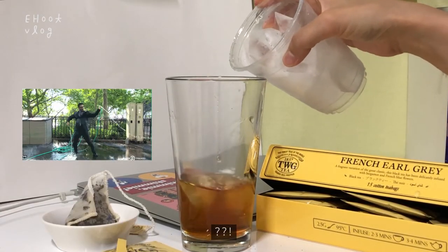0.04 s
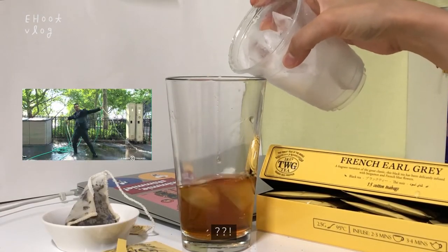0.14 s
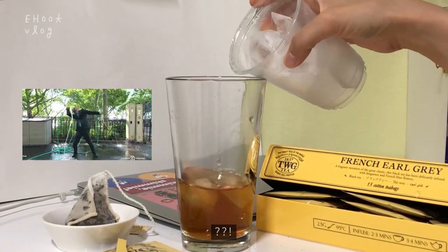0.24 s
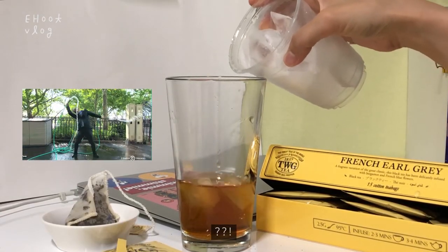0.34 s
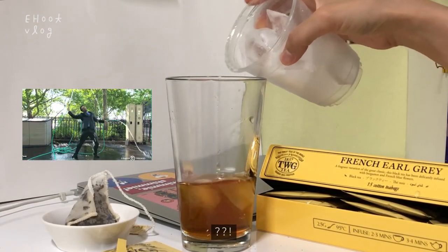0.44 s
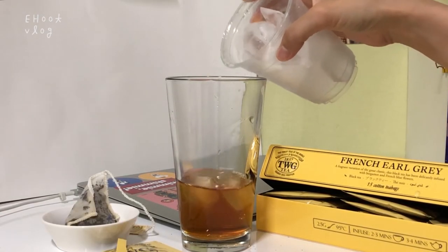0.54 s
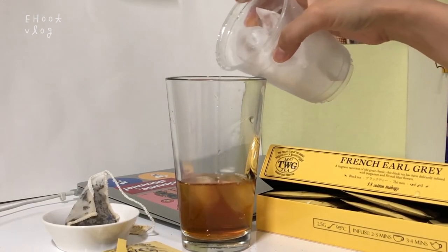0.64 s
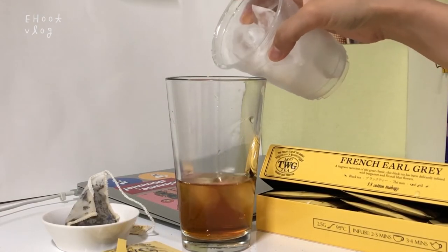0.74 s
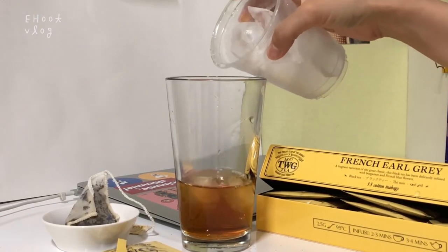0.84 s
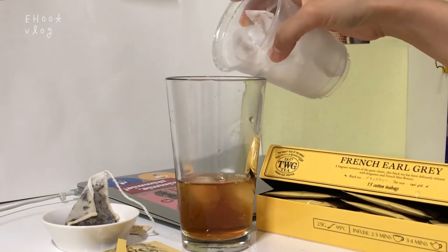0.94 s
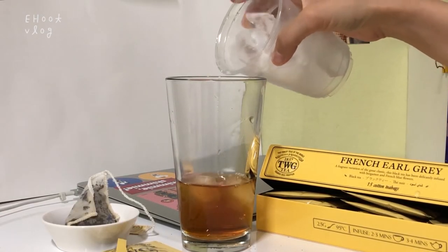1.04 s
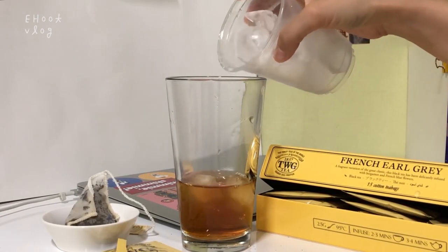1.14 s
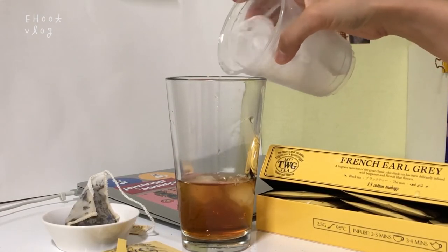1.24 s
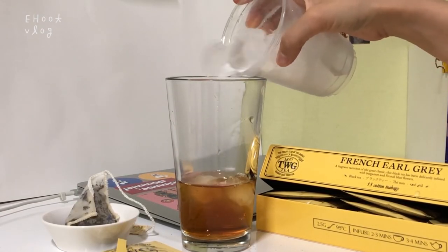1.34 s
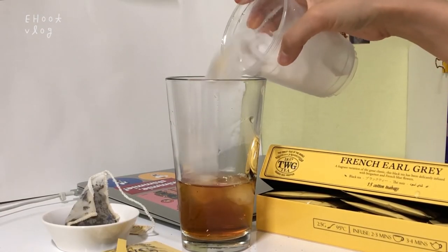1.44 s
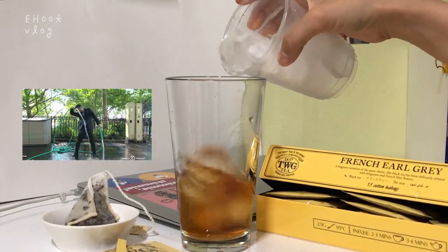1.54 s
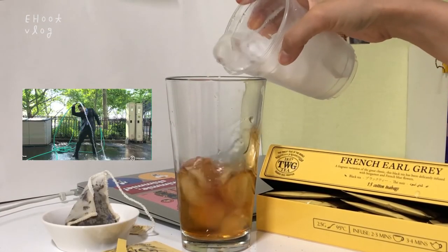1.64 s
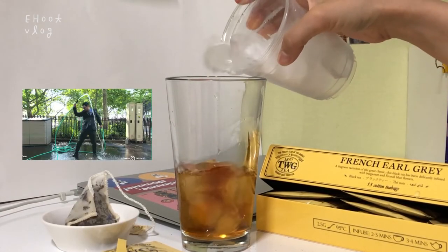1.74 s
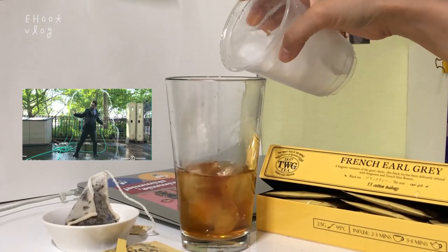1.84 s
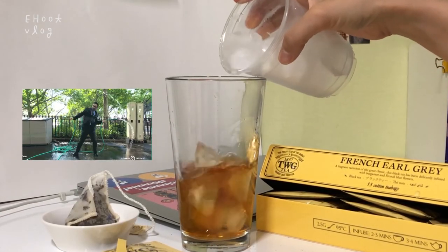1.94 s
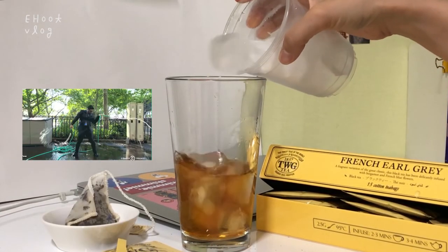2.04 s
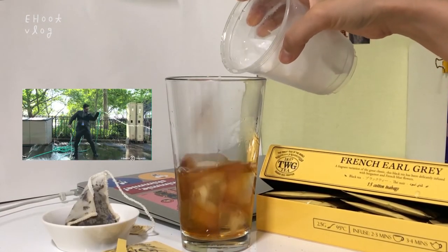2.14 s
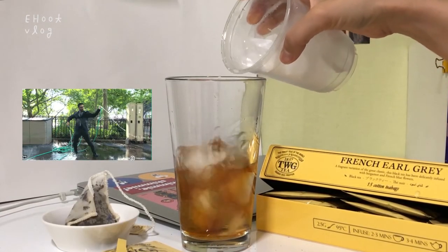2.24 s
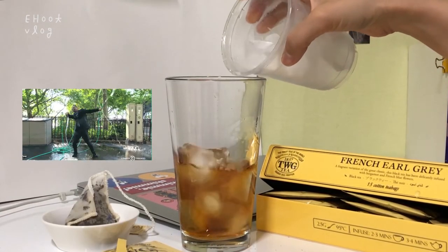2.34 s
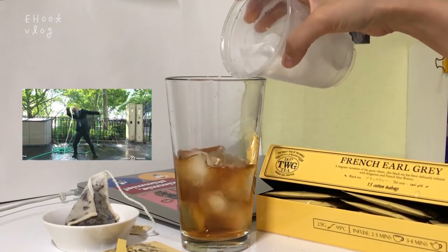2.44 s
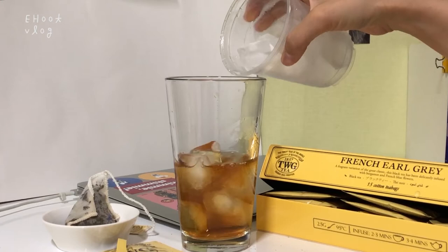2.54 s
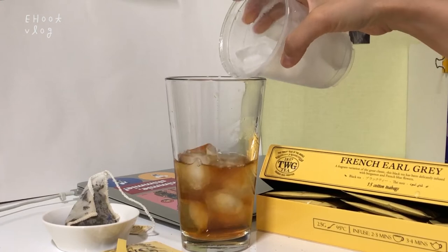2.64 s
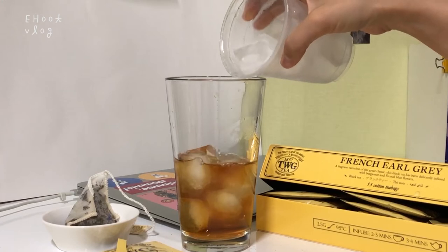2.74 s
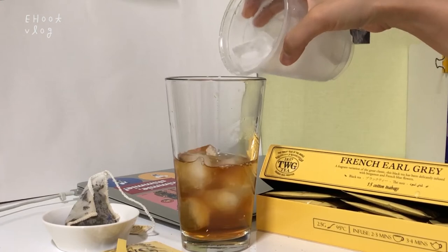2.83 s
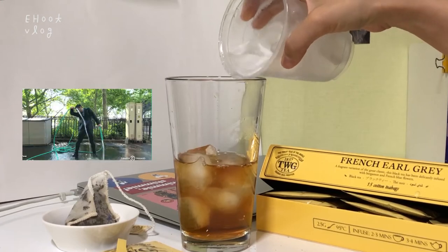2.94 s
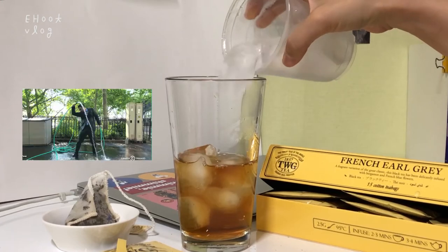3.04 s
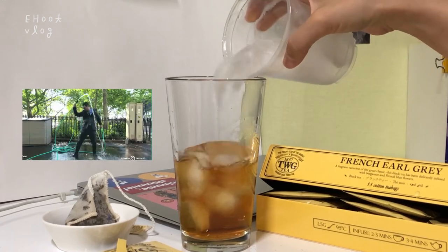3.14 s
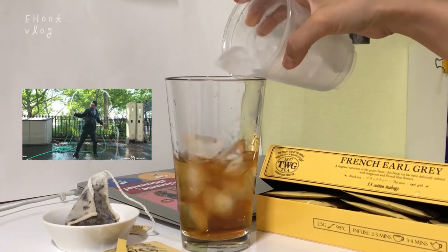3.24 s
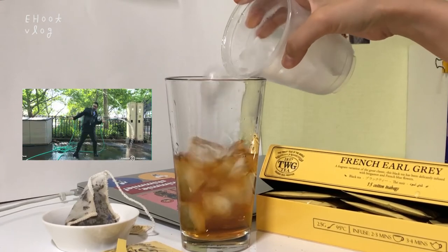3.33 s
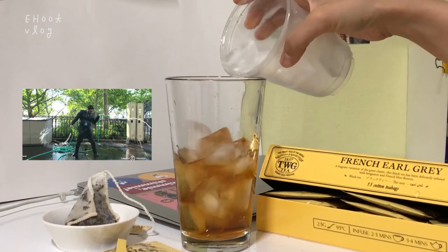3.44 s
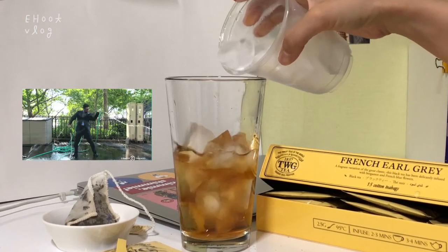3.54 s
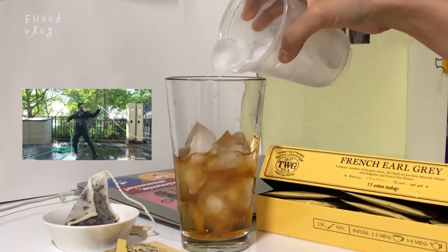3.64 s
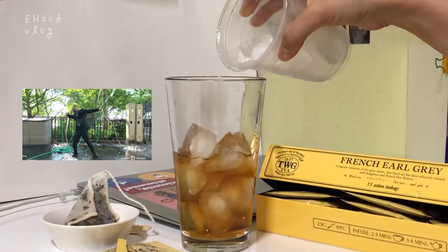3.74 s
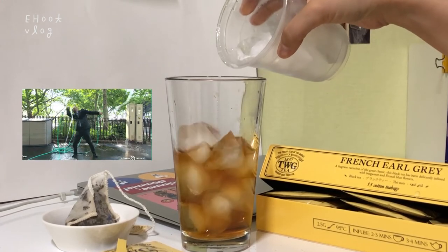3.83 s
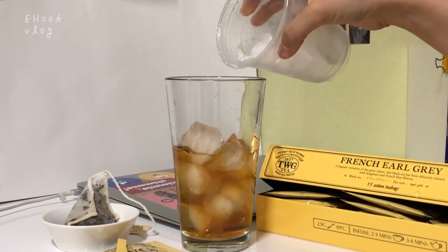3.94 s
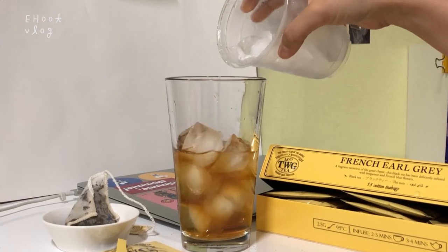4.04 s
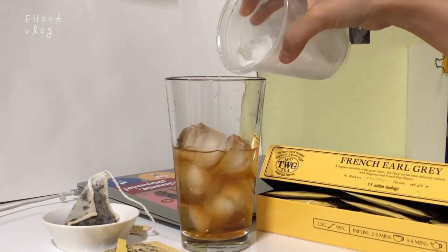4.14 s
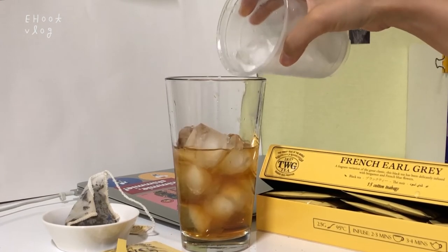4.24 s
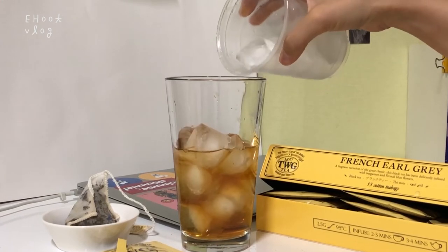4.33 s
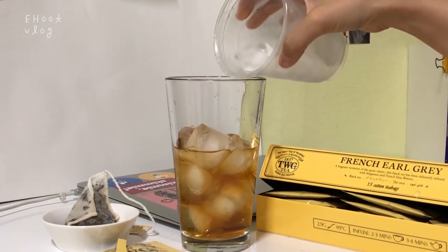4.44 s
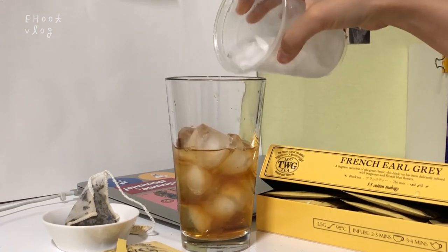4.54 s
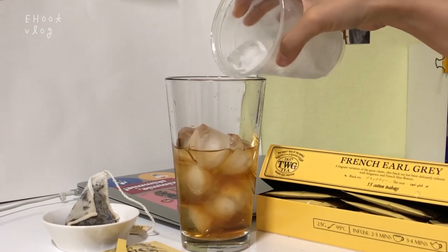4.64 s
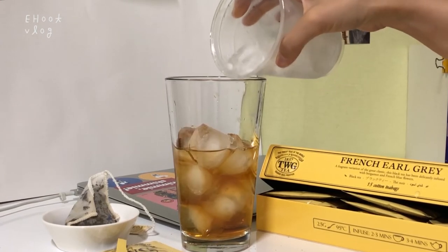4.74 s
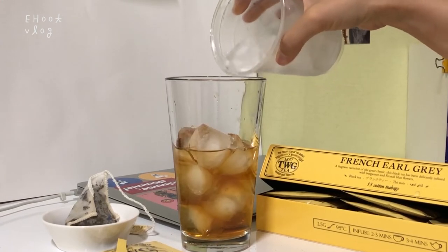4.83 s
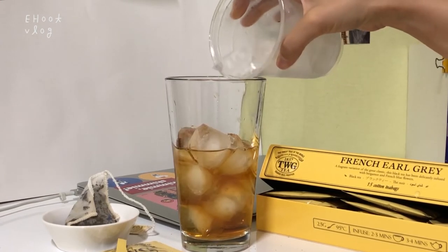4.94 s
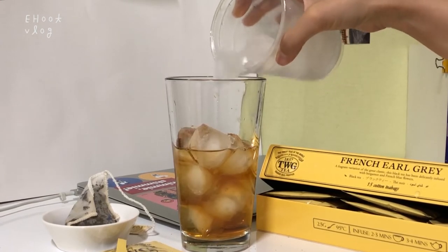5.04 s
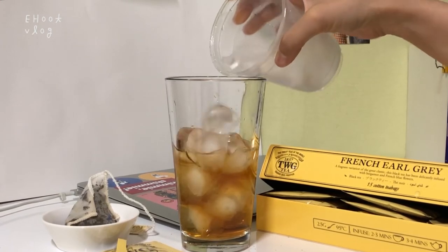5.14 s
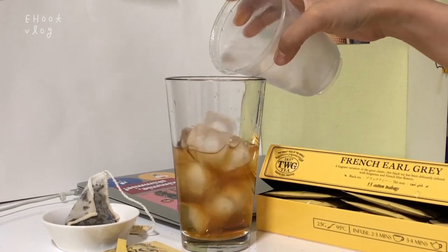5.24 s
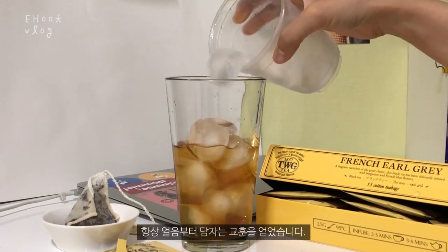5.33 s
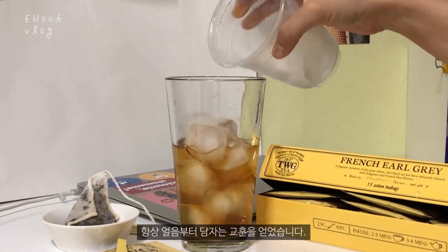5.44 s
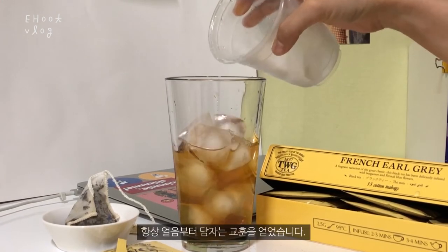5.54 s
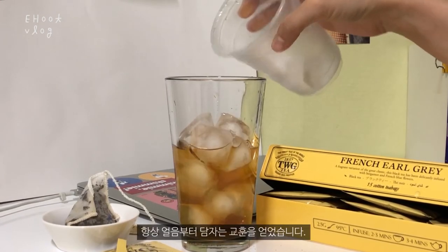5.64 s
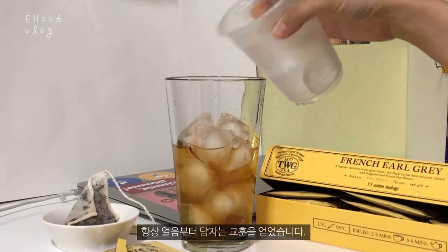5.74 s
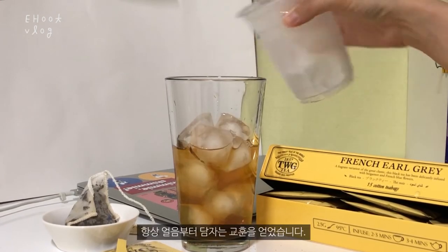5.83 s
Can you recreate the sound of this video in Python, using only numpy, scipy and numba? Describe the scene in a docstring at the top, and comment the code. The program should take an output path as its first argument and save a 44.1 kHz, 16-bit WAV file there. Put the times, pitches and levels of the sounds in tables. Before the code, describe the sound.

A quiet kitchen, miked very close. Faint ticks of ice in a thin plastic cup build to a rattling slide, then cubes tumble into a tall glass of tea with sharp clinks, cracks and low wet gulps. More drops follow in uneven clusters, with hollow cup knocks between them. The glass rings briefly, duller as it fills. A faint murmur and hiss stays underneath.

```python
"""A quiet kitchen, close up: ice cubes slide out of a thin plastic cup and drop into a tall glass of cold tea.
Sliding cubes are dense noise puffs through cup and scrape resonances; knocks are pings, cracks and cup booms.
Cubes clink the glass, whose wall modes are decaying sines; the lowest note sinks as the drink rises.
Cubes plunge into the tea with dull gulps, rising low sines within sloshing noise.
A steady faint murmur and hiss lies underneath, and the ice has a short dull reverberation."""
import sys
import numpy as np
from scipy import signal
from scipy.fft import rfft, irfft
from scipy.io import wavfile
from scipy.ndimage import uniform_filter1d
from numba import njit

SR = 44100
rng = np.random.default_rng(int(sys.argv[2]) if len(sys.argv) > 2 else 0)


def output_pcm(signal):
    """Save a mono or channel-first signal as 16-bit PCM at the path in sys.argv[1].

    Samples are clipped to [-1, 1] before scaling.
    """
    pcm = np.clip(np.atleast_2d(signal).T, -1, 1) * 32767
    wavfile.write(sys.argv[1], SR, np.round(pcm).astype(np.int16))


N = 259308
TIME = np.arange(N) / SR

# resonances of air and tea in the glass: (f/Hz, width/Hz, relative level/dB)
SLOSH_MODES = [(135.7, 30, -5), (225.5, 53, 0.5), (340, 75, 0.5), (488, 118, -6)]


def undb(db):
    """Decibels to gain."""
    return 10 ** (np.asarray(db) / 20)


def unit(x):
    """Scale to rms 1."""
    return x / np.sqrt(np.mean(x ** 2))


def band(x, hz, width_hz):
    """Two-pole resonance, gain 1 at the centre."""
    return signal.lfilter(*signal.iirpeak(min(hz, .45 * SR), max(hz / width_hz, .6), SR), x)


def resonate(x, modes):
    """Sum of resonances of alternating sign."""
    return sum((-1) ** k * undb(db) * band(x, hz, width) for k, (hz, width, db) in enumerate(modes))


@njit
def sweep(x, hz, width):
    """Band-pass whose centre moves."""
    y, b, l = np.empty(len(x)), 0., 0.
    for i in range(len(x)):
        g, k = np.tan(np.pi * hz[i] / SR), width / hz[i]
        v = (b + g * (x[i] - l)) / (1 + g * (g + k))
        b, l, y[i] = 2 * v - b, l + 2 * g * v, k * v
    return y


def fade(t, t60):
    """Exponential decay, 60 dB down after t60."""
    return np.exp(-np.log(1000) * t / max(t60, .002))


def bursts(per_s, scatter_db, t60):
    """Noise in short uneven puffs, one for each tiny impact; a few are much larger than the rest."""
    hit = rng.random(N) < per_s / SR
    size_db = scatter_db * np.minimum(rng.exponential(size=N), 4)
    size = undb(size_db) * hit / np.sqrt(per_s)
    envelope = signal.lfilter([1], [1, -fade(1 / SR, t60)], size)
    return envelope * rng.standard_normal(N)


def add(out, s, sound):
    """Mix a sound in at a time."""
    i = int(s * SR)
    out[i:i + len(sound)] += sound[:N - i]


def kitchen():
    """Steady faint low murmur and hiss: noise shaped by a fixed spectrum."""
    # colour of the background: (f/Hz, relative level per Hz/dB)
    spectrum = [(20, -25.5), (40, -4.5), (60, 3.5), (120, 3.5), (250, -2.5), (700, -14.5), (1500, -13),
                (3000, -28.5), (6000, -25), (16000, -29.5)]
    level_db = -66  # rms
    hz, db = np.transpose(spectrum)
    colour = undb(np.interp(np.log(np.fft.rfftfreq(N, 1 / SR) + 1), np.log(hz), db))
    noise = irfft(rfft(rng.standard_normal(N)) * colour, N)
    return undb(level_db) * unit(noise)


def cup_modes(s):
    """Modes of the cup at a time; the tilt shares the boom between the lowest two."""
    # body resonances of the cup: (f/Hz, width/Hz, relative level before the tilt/dB)
    body = [(766, 177, 2.5), (878.4, 142, -3.5), (1784, 200, -4.5), (2696, 110, -18)]
    # the cup tilts and empties: (t/s, shift of the second mode against the first/dB)
    tilt = [(0, -25.5), (1.4, -4), (2.6, 4.5), (4.4, 8), (4.53, -9.5), (4.75, 0.5), (5.8, 9.5)]
    lean = np.interp(s, *np.transpose(tilt)) / 2
    return [(hz, width, db + side * lean) for (hz, width, db), side in zip(body, (-1, 1, 0, 0))]


def sliding():
    """Level of the rattle in the cup: straight ramps in dB up to each peak and down again."""
    # cubes slide along the tilted cup: (peak t/s, peak level/dB, rise over ramp_db/s, fall over ramp_db/s)
    slides = [(0.05, -77.5, 0.51, 1), (0.488, -62.5, 0.044, 0.079), (0.628, -60, 0.061, 0.2),
              (0.851, -59, 0.22, 0.32), (1.011, -54.5, 0.2, 0.65), (1.304, -41, 0.2, 0.27),
              (1.458, -40.5, 0.058, 0.03), (1.601, -46.5, 0.062, 0.051), (1.755, -47, 0.063, 0.04),
              (1.948, -49.5, 0.81, 0.25), (2.3, -56, 0.077, 0.35), (2.599, -50.5, 0.36, 0.041),
              (2.8, -61.5, 0.033, 0.48), (3.2, -38.5, 0.46, 0.34), (3.53, -53.5, 0.28, 0.048),
              (3.69, -58, 0.045, 0.031), (3.9, -61.5, 0.2, 0.3), (4.25, -58, 0.13, 0.28),
              (4.436, -61, 0.024, 0.2), (4.541, -45, 0.09, 0.17), (4.796, -52.5, 0.053, 0.44),
              (5, -46.5, 0.29, 0.13), (5.135, -52.5, 0.12, 0.14), (5.369, -48.5, 0.32, 0.2),
              (5.7, -57.5, 0.16, 0.97), (5.809, -40, 0.042, 0.058)]
    ramp_db = 20
    peak, db, swell, die = np.transpose(slides)[:, :, None]
    t = TIME[::64]
    level = undb(db - ramp_db * np.maximum((peak - t) / swell, (t - peak) / die))
    return np.interp(TIME, t, np.sqrt(np.sum(level ** 2, axis=0)))


def settling():
    """Levels of scrape and slosh in the glass: a quick rise at each landing, then decay."""
    # cubes in the glass jostle and settle: (t/s, scrape level/dB, slosh level/dB, t60/s)
    settles = [(0.0, -66.5, -71.5, 1.53), (0.482, -42, -40, 0.059), (1.475, -38.5, -49, 0.35),
               (1.56, -46.5, -64, 0.26), (1.85, -46, -48.5, 0.5), (1.89, -30, -38, 0.063),
               (2.185, -35.5, -28, 0.19), (2.3, -60, -51.5, 0.49), (3.131, -57.5, -33.5, 0.24),
               (3.25, -45.5, -42.5, 0.52), (3.406, -44.5, -40.5, 0.57), (3.777, -42.5, -39.5, 0.46),
               (3.831, -35, -59, 0.16), (3.95, -76, -65.5, 1.2), (4.415, -39.5, -56, 0.13),
               (5.118, -44.5, -46, 0.91), (5.43, -30.5, -27.5, 0.16), (5.52, -66, -50, 0.61)]
    rise_s = 0.017
    s, scrape_db, slosh_db, t60 = np.transpose(settles)[:, :, None]
    t = TIME[::64]
    since = np.maximum(t - s, 0)
    shape = np.minimum(since / rise_s, 1) * undb(-60 * since / t60)
    levels = [np.sqrt(np.sum((undb(db) * shape) ** 2, axis=0)) for db in (scrape_db, slosh_db)]
    return [np.interp(TIME, t, level) for level in levels]


def slide():
    """Dense small impacts ring the cup and scrape brightly; the tea sloshes below."""
    # broad colours of the scrape: (f/Hz, width/Hz, relative level/dB)
    scrape_modes = [(2360, 5360, 3.5), (4280, 3340, 3.5), (5420, 380, 5), (7700, 3000, -7),
                    (12200, 12000, -15)]
    scrape_db, slosh_db = -4.5, -9.5  # over the cup hollow; the scrape's holds at brisk_db
    # the scrape gains this share of each dB above this level, and loses it below
    brisk_db, brisk_gain = -48.5, 0.28
    cup, (jostle, swash) = sliding(), settling()

    # brisk sliding packs the impacts closer
    busy = np.clip(np.hypot(cup, jostle) / undb(brisk_db), .45, 2.5)
    # shifting cubes keep retuning the air in the cup
    waver = 1 + 0.035 * unit(band(rng.standard_normal(N), 8, 13))
    rattle = bursts(650 * busy, 3, .012)
    hollow = 0
    for hz, width, db in cup_modes(TIME):
        once = sweep(rattle, hz * waver, 1. * width)
        hollow = hollow + undb(db) * sweep(once, hz * waver, 1. * width)

    grit = resonate(bursts(700 * busy, 4.5, .004), scrape_modes)
    grit = signal.sosfilt(signal.butter(2, 1500, "high", fs=SR, output="sos"), grit)
    # each facet that catches clicks at its own pitch, a new one every 256 samples
    facet_hz = np.repeat(1700 * 2 ** (1.8 * rng.random(N // 256 + 1)), 256)[:N]
    clicks = sweep(bursts(410, 3.2, 0.006), facet_hz, 350.0)
    scrape = unit(unit(grit) + 0.45 * unit(clicks))
    slosh = unit(resonate(bursts(300, 3, .03), SLOSH_MODES))

    cup_scrape = undb(scrape_db) * cup * (cup / undb(brisk_db)) ** brisk_gain
    scrape_level = np.hypot(cup_scrape, jostle)
    slosh_level = np.hypot(undb(slosh_db) * cup, swash)
    return cup * unit(hollow) + scrape_level * scrape + slosh_level * slosh


def knocks():
    """A short ping, a broad crack with a crunchy tail, and the boom of the hollow cup."""
    # short knocks of ice on ice, cup or glass foot, and a bubble:
    # (t/s, overall level/dB, ping f/Hz, treble crack relative level/dB, hollow cup relative level/dB)
    hits = [(0.0288, -51.5, 4270, 3, -8), (0.105, -60, 5500, -30, -24), (0.103, -56, 2550, -30, -25),
            (0.1347, -58.5, 5470, -23, -10), (0.212, -68, 5400, -26, -20), (0.233, -59.5, 3200, -2, -11),
            (0.354, -70, 5450, -20, -23), (0.479, -48.5, 5050, 6, 1), (0.492, -54, 4300, -23, -18),
            (0.5907, -59, 3980, -33, 12.5), (0.7063, -54, 2200, -18, -10), (0.723, -45, 2200, 0, 1),
            (0.779, -48.5, 4200, -22, -13), (0.836, -59.5, 3330, 17.5, 3), (0.8646, -50.5, 3080, -33, 2),
            (0.882, -46, 3340, -15, 10), (0.944, -51.5, 5500, 14, -29), (0.9941, -30.5, 5680, 12.5, -36),
            (1.1526, -40, 2780, 13, 8), (1.1804, -35, 4200, -23, -28), (1.217, -31.5, 4130, -28, -32),
            (1.2422, -34, 3330, -35, -20), (1.287, -34, 3180, -54, -14), (1.3299, -29.5, 5950, -22, -13),
            (1.343, -35, 4400, -20, 13.5), (1.3993, -35.5, 5360, -30, -28), (1.407, -31.5, 5070, -22, -27),
            (1.4721, -29, 5500, -28, 2), (1.477, -31, 2820, -30, -24), (1.494, -24, 5380, -28, -34),
            (1.509, -23.5, 5380, -20, -22), (1.539, -19.5, 5290, -3, -23), (1.6075, -24, 2330, -35, -26),
            (1.6216, -35, 4860, 10, -32), (1.624, -29, 3020, -23, 0), (1.634, -30, 2630, -20, -11),
            (1.638, -30, 1300, -30, -14), (1.678, -38, 2930, -25, -21), (1.7316, -39, 5670, -31, 6),
            (1.755, -40, 4000, -12, 12), (1.8141, -34, 5200, -13, -11), (1.8816, -20, 3770, -4, -10),
            (1.918, -24, 3800, -21, -27), (2.0267, -36, 2380, -19, -23), (2.179, -28, 4800, 5, -13),
            (2.1878, -20, 4340, -4, -36), (2.21, -21, 3520, -36, -28), (2.26, -29, 3220, -3, -38),
            (2.299, -41.5, 3870, -20, -18), (2.379, -43, 4400, 1, -11), (2.434, -55.5, 6600, 14, -15),
            (2.469, -50, 3200, 14, 15), (2.499, -46.5, 2700, -20, 10), (2.5257, -44, 2900, -22, 13.5),
            (2.546, -50.5, 1935, -20, 19.5), (2.5696, -52, 3550, -30, 0), (2.592, -44.5, 3600, -33, 19.5),
            (2.616, -46.5, 3270, -20, -6), (2.668, -46.5, 2470, 0, 14), (2.684, -48.5, 2000, -23, 15),
            (2.7813, -48, 3380, -38, 11), (2.816, -59, 1830, -20, 24), (2.866, -43, 3600, -27.5, -20),
            (2.883, -33, 3820, -14, 8), (2.89, -43, 3880, -16.5, -5), (2.9081, -44, 3270, -35.5, 16),
            (2.936, -34.5, 3670, -37, 6.5), (2.9645, -32.5, 5700, -21, 9), (2.9988, -12, 7100, -45, -30),
            (3.029, -27.5, 8050, -28, -34), (3.046, -30.5, 5170, -25, 7), (3.0673, -34, 3250, -16, 16),
            (3.082, -34.5, 6500, -6, -21.5), (3.1299, -24.5, 3900, 9, -23), (3.1457, -30, 4500, -12, -25),
            (3.246, -28.5, 4300, 6, -6), (3.4035, -22.5, 4330, -36, -20), (3.488, -46, 4330, -37.5, -23),
            (3.5498, -33.5, 2680, -37, 4), (3.6727, -45, 2640, -27, -19), (3.7723, -12.5, 4830, -24, -33),
            (3.7858, -16.5, 4400, -26, -57), (3.8085, -22, 3460, -24, -40), (3.8237, -16, 4560, 9, -46),
            (3.862, -33, 4670, -23, -25.5), (3.957, -54, 3000, -25, -25), (4.009, -55, 3200, -30, -24),
            (4.039, -57.5, 2290, -28.5, -19), (4.2323, -60, 4610, 9, -6), (4.2807, -51.5, 5750, 21, 2.5),
            (4.4125, -33.5, 4130, -47, 3), (4.4265, -45.5, 3960, -22, 19.5), (4.4897, -50, 8000, 14, -12),
            (4.5199, -20, 2060, -35, 5), (4.573, -36, 1900, 10, -17), (4.6337, -38, 9300, 16, -37),
            (4.6529, -32, 2260, 0, 8), (4.6948, -46, 2900, 8, 8), (4.7724, -46.5, 3050, -18, -2),
            (4.79, -42, 5930, 12, -11), (4.8722, -35.5, 5760, 4, 5.5), (4.947, -43, 2670, 15, 4),
            (5.035, -46, 3500, 16.5, -10), (5.1173, -23.5, 2660, 2.5, -20), (5.177, -39, 4540, -23, -24),
            (5.2091, -26.5, 4070, -30, -33.5), (5.232, -30, 2780, -29, -21), (5.3526, -39.5, 3440, 3, 15.5),
            (5.4293, -21.5, 4370, -28, -32), (5.469, -25.5, 2640, -8, -36), (5.6258, -59, 4480, -10, 11),
            (5.7196, -58.5, 3640, 24, -27), (5.757, -41, 3160, -34, -0.5), (5.7978, -23.5, 3440, -42, 13),
            (5.838, -47, 3020, -10, 26.5)]
    # ring of the thick foot of the glass: (f/Hz, t60/s, relative level/dB)
    foot_modes = [(5490, 0.03, 8.5), (8560, 0.035, -6), (13030, .15, -16)]
    out, t = np.zeros(N), TIME[:SR // 6]
    foot = sum(undb(g) * np.sin(2 * np.pi * f * t) * fade(t, t60) for f, t60, g in foot_modes)
    noises = rng.standard_normal((len(hits), len(t)))
    for (s, db, hz, crack_db, cup_db), noise in zip(hits, noises):
        tone = np.sin(2 * np.pi * hz * t) * fade(t, 28 / hz) * (1 - fade(t, 7 / hz))
        rough = band(band(noise, hz, .6 * hz), hz, .6 * hz) * (fade(t, .012) + .09 * fade(t, .12))
        ping = 1.3 * tone + 1.9 * rough
        # pings far from the middle pitches carry less body
        body = min(2600 / hz, hz / 4200) ** 2
        thud = 2.14 * body * band(noise, 2880, 1300) * fade(t, 0.054)
        crack = band(noise, 10000, 9200) * (fade(t, 0.0012) + 0.077 * fade(t, 0.15))
        boom = sum(undb(g) * np.sin(2 * np.pi * f * t) * np.exp(-1.5 * w * t) for f, w, g in cup_modes(s))
        boom = boom * (1 - fade(t, 0.016))
        # a knock pitched near the foot's own note sets it ringing
        match = np.exp(-((hz - foot_modes[0][0]) / 150) ** 2)
        struck = (1 - match) * (ping + thud) + 0.89 * match * foot
        add(out, s, undb(db) * (struck + 0.74 * undb(crack_db) * crack + 0.57 * undb(cup_db) * boom))
    return out


def glass():
    """Each touch stops the ring before it and starts a new one; ice leaning on the wall shortens and roughens it."""
    # cube against the glass wall: (t/s, lowest mode relative level/dB, second mode relative level/dB,
    # loss to each higher mode/dB, freedom to ring/0-1)
    clinks = [(0.105, -51.5, -83, 13, 1), (1.065, -67, -92, 5, 0.8), (1.424, -39, -27, 0, 0.9),
              (1.4714, -36, -39, 9, 0.9), (1.5247, -31, -45, -1.5, 1), (1.61, -43.5, -50, 0, 0.25),
              (1.626, -50.5, -40, 25, 0.75), (1.712, -58, -62, 24, 0.8), (1.73, -55, -58, 11, 0.43),
              (1.846, -41.5, -34.5, 7.5, 0.31), (1.869, -47, -37, 6, 0.47), (1.927, -37, -41, 4.5, 0.32),
              (2.024, -46.5, -64, 16, 0.84), (2.113, -49, -54.5, 7, 0.6), (2.188, -38, -38, 12, 0.5),
              (2.2096, -31, -35.5, 23, 0.62), (2.2592, -53.5, -44.5, 29, 0.64),
              (2.315, -50.5, -59, 20, 0.63), (2.606, -66, -62, 24, 0.62), (3.099, -46.5, -42.5, -5.5, 0.8),
              (3.144, -34.5, -31.5, 11, 0.3), (3.193, -42, -34, 7, 0.25), (3.227, -45, -49, 2, 0.2),
              (3.245, -35.5, -34.5, 2, 0.35), (3.4051, -32.5, -38, 6, 0.11), (3.432, -39, -43.5, 23, 0.27),
              (3.489, -40.5, -50.5, 0.5, 0.2), (3.549, -51, -50, 4.5, 0.11), (3.672, -52, -62.5, 29, 0.04),
              (3.776, -52, -41, 3, 0.9), (3.824, -30, -22.5, 2, 0.11), (3.8686, -35, -38, 3.5, 0.06),
              (3.92, -54.5, -57, 3, 0.2), (4.037, -61.5, -64, 13, 0.1), (4.635, -80, -50, 21, 0.08),
              (5.121, -33.5, -53, 12, 0.02), (5.164, -43.5, -45.5, 24, 0.56), (5.188, -47, -39, 9, 0.5),
              (5.238, -49.5, -56, 9, 0.66), (5.305, -52.5, -59.5, 4, 0.2), (5.4299, -37.5, -50, -1, 0.8),
              (5.442, -32, -38.5, 8, 0.18), (5.47, -32, -45, 2.5, 0.53), (5.5, -42, -45.5, 9, 0.18),
              (5.5644, -62, -65, 19, 0.18), (5.6302, -50, -50.5, 35, 0)]
    # the drink rises: (t/s, lowest glass mode f/Hz)
    fill = [(0, 2071), (1.6, 2071), (2.2, 2041), (3.2, 2007), (3.8, 2000), (5.15, 1982), (5.5, 1962)]
    # upper wall modes: (f/Hz, t60 when free/s)
    upper_modes = [(4560, 0.38), (7765, 0.063), (11770, 0.04)]
    low_t60_s = 0.83  # when free
    # a weak mode that sounds with the lowest when ice leans on the wall
    partner_hz, partner_t60_s, partner_db = 2825, .3, -5.5
    # the rim keeps ringing faintly once the damped part has died
    after_db, after_t60_s = -18.5, 0.29
    contact_db = -18.5  # tick of the touch against the louder of the two lowest modes

    s, low_db, second_db, loss_db, loose = np.transpose(clinks)
    leaning_db = low_db + partner_db * (1 + 3 * loose)
    mode_db = [low_db, second_db, second_db - loss_db, second_db - 2 * loss_db, leaning_db]
    low_hz = np.interp(TIME, *np.transpose(fill))
    modes = [(low_hz, low_t60_s)] + upper_modes + [(partner_hz, partner_t60_s)]
    last = np.maximum(np.searchsorted(s, TIME) - 1, 0)  # the latest touch at each moment
    since, free = np.maximum(TIME - s[last], 0), np.clip(loose[last], .03, 1)
    started = TIME > s[0]
    out = 0
    for (hz, t60), db in zip(modes, mode_db):
        chatter = unit(band(rng.standard_normal(N), 30, 36))
        decay = undb(-60 * since / (t60 * free)) + undb(after_db - 60 * since / after_t60_s)
        ring = decay * undb(db[last] + 3.54 * (1.26 - free) * chatter) * started
        # every touch starts at a new random phase
        phase = 2 * np.pi * (np.cumsum(hz * np.ones(N)) / SR + rng.random(len(s))[last])
        # a short average softens the steps in level
        out = out + 1.764 * uniform_filter1d(ring, size=24) * np.sin(phase)
    tick = undb(np.maximum(low_db, second_db)[last] + contact_db - 60 * since / 0.014) * started
    return out + tick * band(rng.standard_normal(N), 4000, 6000)


def plunges():
    """The cavity behind a sinking cube closes: a low rising gulp within a burst of dull slosh."""
    # cube into the tea: (t/s, overall level/dB, starting cavity f/Hz, t60/s)
    drops = [(1.475, -13.5, 399, 0.075), (1.527, -23.5, 373, 0.11), (1.548, -20, 214, 0.068),
             (1.741, -33, 337, 0.084), (1.884, -20.5, 232, 0.12), (1.916, -27.5, 368, 0.014),
             (2.181, -19.5, 360, 0.083), (3.128, -27.5, 364, 0.11), (3.215, -26.5, 370, 0.11),
             (3.247, -34, 338, 0.11), (3.408, -19, 347, 0.095), (3.448, -33, 185, 0.092),
             (3.778, -24, 362, 0.074), (3.825, -29.5, 367, 0.12), (4.425, -29.5, 368, 0.076),
             (4.946, -44, 365, 0.13), (5.119, -18.5, 392, 0.06), (5.162, -27, 350, 0.1),
             (5.198, -36, 235, 0.13), (5.426, -21, 430, 0.026), (5.469, -31, 199, 0.036),
             (5.714, -49, 266, 0.27)]
    out, t = np.zeros(N), TIME[:SR // 4]
    noises = rng.standard_normal((len(drops), len(t)))
    for (s, db, hz, t60), noise in zip(drops, noises):
        gulp = np.sin(2 * np.pi * hz * t * (1 + 1.7 * t))
        slosh = unit(resonate(noise, SLOSH_MODES))
        splash = unit(band(noise, 1000, 630)) * fade(t, 0.049)
        envelope = fade(t, t60) * (1 - fade(t, 0.0018))
        add(out, s, undb(db) * ((0.28 * gulp + .5 * slosh) * envelope + 0.27 * splash))
    return out


def reverberate(ice):
    """Dull room tail: the sound convolved with low-passed, decaying noise of unit energy."""
    room_t60_s, room_db, room_top_hz = 0.28, -14, 5060
    t = TIME[:SR // 2]
    noise = signal.lfilter(*signal.butter(1, room_top_hz, fs=SR), rng.standard_normal(len(t)))
    tail = noise * fade(t, room_t60_s) * (t > .003)
    return undb(room_db) * signal.fftconvolve(ice, tail / np.sqrt(np.sum(tail ** 2)))[:N]


def scene():
    """The ice with its dull reverberation, the close ring of the glass, and the background."""
    ice = slide() + knocks() + plunges()
    # a small glass radiates no deep bass
    ice = signal.sosfilt(signal.butter(3, 95, "high", fs=SR, output="sos"), ice)
    return (ice + glass() + reverberate(ice) + kitchen())[None]


def record(dry):
    """The phone cuts the top: a steep low-pass."""
    top_hz = 15900
    return signal.sosfilt(signal.cheby1(11, .2, top_hz, fs=SR, output="sos"), dry)


dry = scene()
out = record(dry)
output_pcm(out)
```